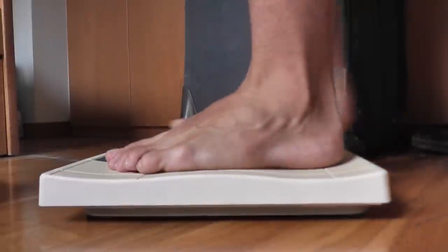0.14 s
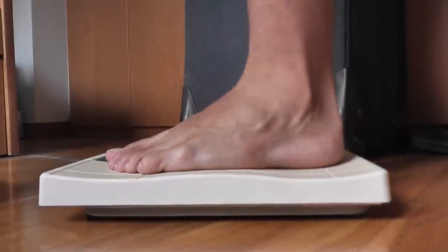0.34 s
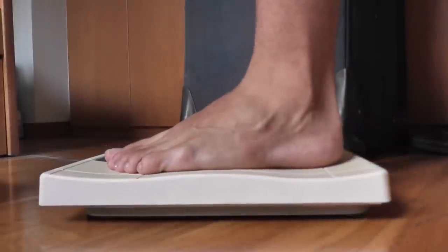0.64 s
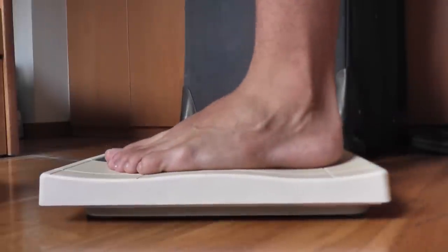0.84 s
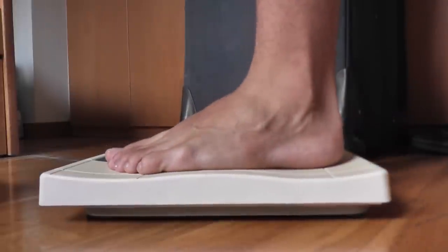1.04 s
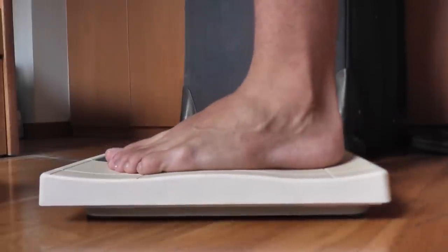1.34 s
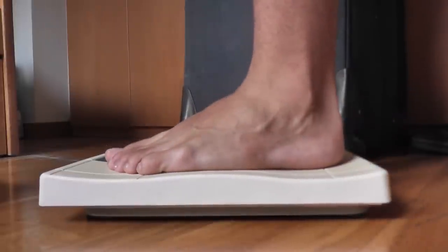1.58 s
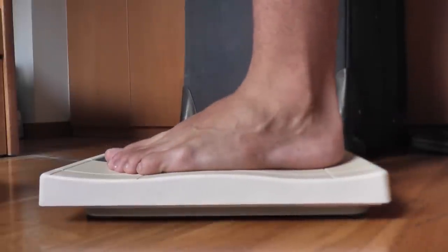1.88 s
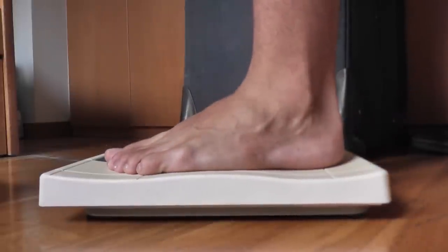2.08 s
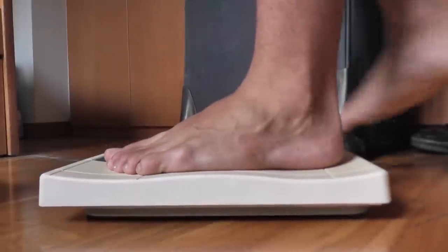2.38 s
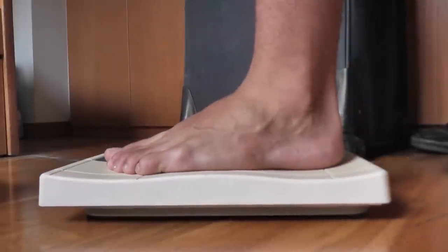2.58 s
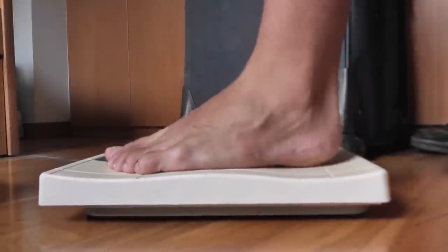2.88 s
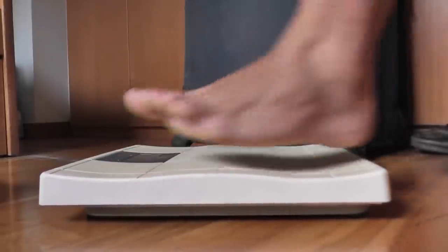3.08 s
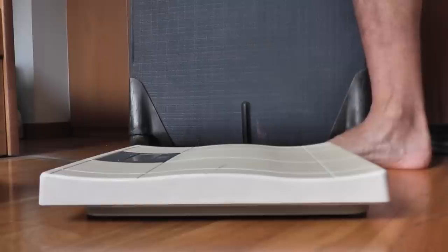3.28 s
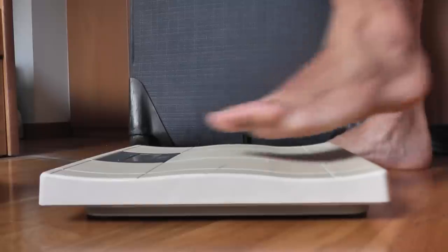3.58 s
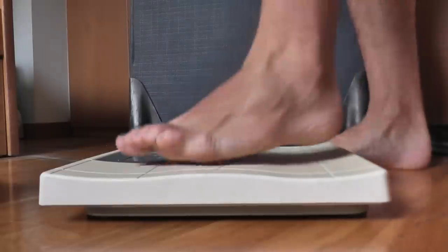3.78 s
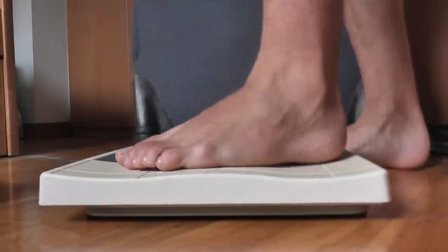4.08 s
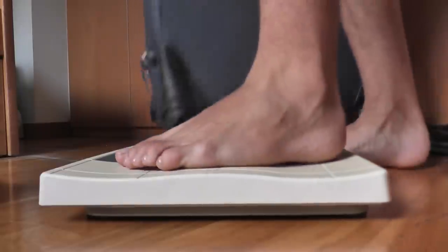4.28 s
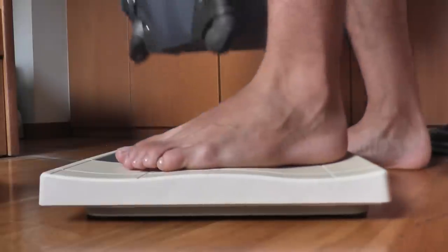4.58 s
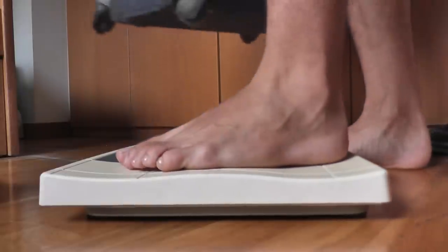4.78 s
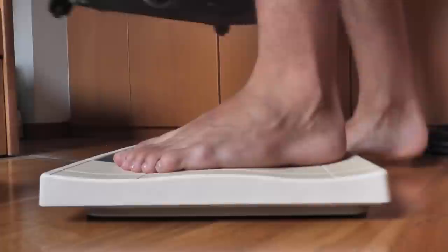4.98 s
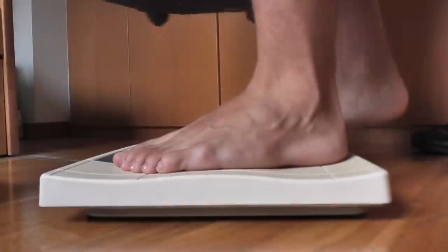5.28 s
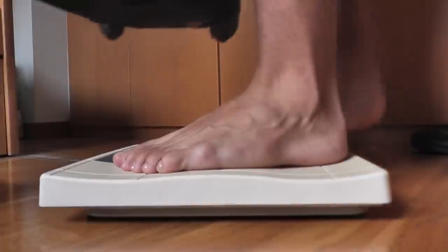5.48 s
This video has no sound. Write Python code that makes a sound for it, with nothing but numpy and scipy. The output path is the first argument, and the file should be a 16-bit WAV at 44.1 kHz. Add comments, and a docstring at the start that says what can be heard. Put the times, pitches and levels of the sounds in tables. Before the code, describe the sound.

Bare feet step off and back onto a hollow plastic bathroom scale, with clacks, creaks, a dial rattle, then a suitcase's rubbing fabric hiss.

```python
"""A low hum in a small room, then clacks and creaks: bare feet on a mechanical bathroom scale, on a wooden floor.
The platform springs up when the weight leaves it, and its dial rattles back to the stop.
Then the person steps on again with a suitcase, whose fabric rubs and hisses as it is lifted.
Blows are decaying sine waves plus a burst of noise; creaks, skin, fabric and room rumble are shaped noise.
The hum is two wavering sine waves."""
import sys
import numpy as np
from scipy import signal
from scipy.fft import rfft, irfft, next_fast_len
from scipy.io import wavfile
from scipy.ndimage import uniform_filter1d, map_coordinates

SR = 44100
rng = np.random.default_rng(int(sys.argv[2]) if len(sys.argv) > 2 else 0)


def to_wav(s):
    """Save 16-bit WAV."""
    ch = np.atleast_2d(s).T  # columns
    pcm = np.round(np.clip(ch, -1, 1) * 32767)  # PCM
    wavfile.write(sys.argv[1], SR, pcm.astype(np.int16))


N = 248724  # length in samples


def amp(db):
    """Decibels to gain."""
    return 10 ** (np.asarray(db) / 20)


def unit(x):
    """Scale to an rms (average strength) of 1."""
    return x / np.sqrt(np.mean(x ** 2) + 1e-20)


def seconds():
    """The time of every sample."""
    return np.arange(N) / SR


def along(points, hz):
    """Read a curve of (Hz, value) points, joined by lines on a log frequency axis."""
    point_hz, value = np.transpose(points)
    return np.interp(np.log(hz + 1), np.log(point_hz + 1), value)


def curve(rows):
    """Join (seconds, value) points into one value per sample."""
    s, value = np.transpose(rows)
    return np.interp(seconds(), s, value)


def wobble(rate):
    """A smooth random curve with this many random points a second."""
    points = rng.standard_normal(int(N * rate / SR) + 4)
    return map_coordinates(points, [np.arange(N) * rate / SR])


def filtered(x, response):
    """Multiply the spectrum of x by a gain that depends on frequency."""
    size = x.shape[-1]
    padded = next_fast_len(size + 8192)  # spare room at the end, so the filter does not wrap around
    spectrum = rfft(x, padded) * response(np.fft.rfftfreq(padded, 1 / SR))
    return irfft(spectrum, padded)[..., :size]


def coloured(x, spectrum):
    """Shape x with a table of (Hz, dB) points, then scale it to rms 1."""
    return unit(filtered(x, lambda hz: amp(along(spectrum, hz))))


def stereo_noise(side_db, size):
    """White noise shared by both ears, plus a part with opposite signs that makes it wide."""
    mid, side = rng.standard_normal((2, size)) * amp([[0], [side_db]])
    return np.array([mid + side, mid - side])


# How long the walls answer.
# Each row: frequency in Hz, time to fade by 60 dB in seconds.
ROOM_FADE = [(100, 0.39), (500, 0.21), (2000, 0.33), (7000, 0.29), (14000, 0.037)]


def in_room(x, wet_db, side_db):
    """A mono sound plus the walls' answer: fresh noise that fades at its own speed at each frequency."""
    hz, t, noise = signal.stft(stereo_noise(side_db, size=SR // 2), SR, nperseg=256)
    fade = amp(-60 * t / along(ROOM_FADE, hz)[:, None])
    onset = 1 - np.exp(-t / 0.00085)
    tail = signal.istft(noise * fade * onset, SR, nperseg=256)[1]
    tail *= amp(wet_db) / np.linalg.norm(tail[0])
    tail[:, 0] += 1  # the direct sound
    return signal.fftconvolve(x[None], tail, axes=1)[:, :len(x)]


# The colour of the room's rumble. Each row: frequency in Hz, relative level in dB.
RUMBLE_COLOUR = [(15, -76), (25, -62), (59, -6.5), (96, -10.5), (128, -6), (186, -15), (205, -10.5),
                 (279, -12), (386, -19), (517, -18), (788, -22.5), (988, -30), (1200, -38), (1560, -61),
                 (2640, -120)]
# The hum's notes. Each row: frequency in Hz, middle level in dB, around which it wavers.
HUM_NOTES = [(129, -56), (177, -58.5)]
# The colour of the room's faint hiss. Each row: frequency in Hz, relative level in dB.
HISS_COLOUR = [(700, -46), (1100, 3.5), (1450, 5), (1800, -3.5), (2250, -8), (2900, -3), (3800, -6.5),
               (4600, -11.5), (6100, -5), (7500, -11.5), (9000, -12), (11000, -16.5), (13400, -16.5),
               (14200, -49)]
RUMBLE_DB, HISS_DB = -52.5, -65


def room_tone():
    """A steady noise rumble and faint hiss, with sine waves whose loudness and phase waver."""
    t = seconds()
    hum = 0
    for hz, db in HUM_NOTES:
        loudness = amp(db + 2.5 * wobble(7))
        hum = hum + loudness * np.sin(2 * np.pi * hz * t + .7 * wobble(9))
    rumble = amp(RUMBLE_DB) * coloured(stereo_noise(-2.3, size=N), RUMBLE_COLOUR)
    hiss = amp(HISS_DB) * coloured(stereo_noise(-9.0, size=N), HISS_COLOUR)
    return rumble + hum + hiss


# Skin dragging over plastic and wood.
# Each row: middle of the stroke in seconds, length in seconds, level in dB.
SKIN_STROKES = [(3.855, 0.03, -41.5), (3.968, 0.042, -39), (4.059, 0.011, -42), (4.098, 0.052, -36),
                (5.278, 0.022, -42), (5.325, 0.026, -39), (5.611, 0.024, -33)]
# The colour of the skin noise. Each row: frequency in Hz, relative level in dB.
SKIN_COLOUR = [(150, -17), (400, 0.5), (800, 1.5), (1000, -6), (1450, -1), (1800, -6), (2300, -23),
               (3500, -18), (8000, -37), (15000, -60)]


def scuffs():
    """Short strokes of skin, sticking and slipping unevenly: noise swells with a random flutter."""
    t = seconds()
    strokes = sum(amp(db) * np.exp(-(2 * (t - s) / length) ** 2) for s, length, db in SKIN_STROKES)
    grain = coloured(amp(0.81 * wobble(400)) * rng.standard_normal(N), SKIN_COLOUR)
    return in_room(strokes * grain, wet_db=-9.5, side_db=0)


JOLT_S, JOLT_WIDTH_S = 2.891, 0.0019  # middle of the push, and its time scale


def jolt():
    """The unloaded scale jumps and gives the floor one low push: a single down-and-up pulse."""
    u = (seconds() - JOLT_S) / JOLT_WIDTH_S
    return amp(-20.5) * u * np.exp(-u ** 2)


# The linkage creaks as the load shifts.
# Each row: peak in seconds, level in dB before the levers' overall cut, build-up in seconds (60 dB of rise).
LINKAGE_CREAKS = [(.208, -35.5, .035), (2.078, -48, .3), (2.163, -39.5, .14), (2.203, -36.5, .18),
                  (3.062, -34.5, .13)]
# The colour of the creaks and the rattle. Each row: frequency in Hz, relative level in dB.
LEVER_COLOUR = [(120, -63), (200, -7), (292, -20), (376, -29), (451, -5), (624, -5.5), (896, -2.5),
                (980, -13.5), (1490, -6), (2210, -20.5), (3670, -16), (4640, -22), (8880, -22.5),
                (13700, -43), (15000, -62)]
# each creak fades fast (seconds per 60 dB) and leaves the dial quivering, softer but longer
CREAK_T60_S, QUIVER_DB, QUIVER_T60_S = 0.13, -20.5, 0.78
# the dial runs back to its stop, getting softer
DIAL_START_S, DIAL_STOP_S, DIAL_DB, DIAL_SLOWS_DB_PER_S = 2.892, 3.06, -32, 74
LEVERS_DB = -2.5  # overall


def levers():
    """The linkage creaks and the dial rattles: dense small slips in uneven clumps."""
    t = seconds()
    dial_runs = (t > DIAL_START_S) * (t < DIAL_STOP_S)
    level = amp(DIAL_DB - DIAL_SLOWS_DB_PER_S * np.abs(t - DIAL_START_S)) * dial_runs
    for s, db, build_up in LINKAGE_CREAKS:
        before, after = np.maximum(s - t, 0), np.maximum(t - s, 0)
        creak = amp(-60 * after / CREAK_T60_S)
        quiver = amp(QUIVER_DB - 60 * after / QUIVER_T60_S)
        swell = amp(db - 60 * before / build_up)
        level = np.hypot(level, swell * (creak + quiver))
    slips = (rng.random(N) < 1500 / SR) * rng.standard_normal(N)  # about 1500 a second
    rough = unit(slips) + 1.64 * rng.standard_normal(N)
    clumps = amp(1.8 * wobble(180))
    grain = coloured(clumps * rough, LEVER_COLOUR)
    return in_room(amp(LEVERS_DB) * level * grain, wet_db=-9.5, side_db=-3.0)


# How fast the suitcase's fabric slides, told by its hiss.
# Each row: time in seconds, level in dB before the boost RUB_HISS_DB.
RUB_SPEED = [(3.34, -60), (3.68, -62), (3.93, -57), (3.96, -48), (4.02, -60), (4.08, -57), (4.12, -43),
             (4.17, -47), (4.26, -40), (4.42, -45), (4.52, -41), (4.81, -49), (4.88, -45), (5.02, -53),
             (5.04, -46), (5.47, -42), (5.5, -49), (5.64, -54)]
# The colour of the fabric's hiss. Each row: frequency in Hz, relative level in dB.
WEAVE_COLOUR = [(880, -65), (1500, -20), (1820, -9.5), (2270, -15), (2860, -4.5), (3540, -3), (4680, -6.5),
                (6490, 0.5), (7790, -5.5), (8580, -3.5), (13600, -27.5), (14600, -41), (15000, -68)]
# The colour of the shell's murmur. Each row: frequency in Hz, relative level in dB.
SHELL_COLOUR = [(41, -66), (70, 3.5), (98, -5), (132, -5), (205, -2), (332, 4), (393, -0.5), (523, 0.5),
                (862, -5.5), (973, -13), (1180, -7), (2270, -19.5), (2600, -15), (3380, -17), (5720, -120)]
RUB_START_S, RUB_HISS_DB = 3.327, 3
SHELL_DB, SHELL_GROWS = -49.5, .6  # murmur at average speed, in the air; its dB per dB of hiss
LIFT_OFF_S, LIFT_S, ON_FLOOR_DB = 4.22, 0.052, 6  # the floor strengthens the murmur until the lift
GRAB_DB, GRAB_S = 6.5, .07  # the first pull shakes the shell, then dies away


def suitcase():
    """Coarse fabric hisses as it slides, and the shell behind it murmurs."""
    t = seconds()
    rub_db = curve(RUB_SPEED)
    since = np.maximum(t - RUB_START_S, 0)
    touching = np.clip(since / .004, 0, 1)

    threads = amp(.5 * wobble(300) + .3 * wobble(25))  # fine and slow unevenness
    hiss = amp(rub_db + RUB_HISS_DB) * coloured(threads * stereo_noise(-12, size=N), WEAVE_COLOUR)
    fizz = filtered(hiss, lambda hz: hz ** 4 / (hz ** 4 + 9500 ** 4))  # the top end
    brighter = amp(.2 * (rub_db - np.percentile(rub_db, 80)))
    hiss = hiss + (brighter - 1) * fizz  # faster rubbing raises the top end, slower lowers it

    on_floor = np.clip((LIFT_OFF_S - t) / LIFT_S + .5, 0, 1)
    speed_db = rub_db - rub_db[since > 0].mean()
    grab_db = GRAB_DB * np.exp(-since / GRAB_S)
    shell_db = SHELL_DB + SHELL_GROWS * speed_db + ON_FLOOR_DB * on_floor + grab_db
    pressure = amp(.6 * wobble(20))
    shell = amp(shell_db) * pressure * coloured(stereo_noise(-8.5, size=N), SHELL_COLOUR)
    return touching * (hiss + shell)


# The colour of hard plastic's contact noise. Each row: frequency in Hz, relative level in dB.
PLASTIC_COLOUR = [(30, -44), (100, 3.5), (200, 3.5), (480, -3), (850, -3), (1000, -13), (1450, 3.5),
                  (2200, -12.5), (3400, -9.5), (4700, -12), (6500, -8.5), (9300, -12), (11500, -22.5),
                  (15000, -28.5)]
# The four parts of a blow, in order: body, thump, clack, tick.
# Each row: lowest frequency in Hz, highest frequency in Hz.
BLOW_BANDS = [(240, 1050), (70, 250), (1000, 3700), (3700, 15000)]


def blows(rows, modes, noise_db, attack, focus_db, wet_db, side_db):
    """Each contact chatters briefly and rings the modes (natural notes); its row sets each band's level."""
    out, t = np.zeros((2, N + SR)), np.arange(SR // 2) / SR
    hz, mode_db, t60 = np.transpose(modes)[:, :, None]
    for s, db, thump_db, clack_db, tick_db, favoured_hz, chatter in rows:
        # the spot that is hit favours some modes
        place_db = focus_db * np.exp(-(np.log(hz / favoured_hz) / 0.066) ** 2)
        strength = amp(mode_db + place_db + rng.normal(0, 1.5, hz.shape))
        life = t60 * amp(0.11 * (db + 9.0))  # light touches are damped sooner by the foot
        ring = np.sum(strength * amp(-60 * t / life) * np.sin(2 * np.pi * hz * t), axis=0)

        # the chatter, and a first touch that always fades fast
        contact = amp(-60 * t / max(chatter, .004)) + 0.53 * amp(-60 * t / 0.0095)
        onset = 1 - np.exp(-t / 0.00033)
        noise = coloured(rng.standard_normal(len(t)), PLASTIC_COLOUR)
        crack = amp(noise_db) * contact * onset * noise

        blow = in_room((ring + crack) * (1 - np.exp(-t / attack)), wet_db, side_db)
        for band, rel_db in zip(BLOW_BANDS, (0, thump_db, clack_db, tick_db)):
            bandpass = signal.butter(3, band, 'bandpass', fs=SR, output='sos')
            part = signal.sosfilt(bandpass, blow)
            peak = np.sqrt(uniform_filter1d(part.mean(0) ** 2, size=220).max())  # loudest 5 ms
            out[:, round(s * SR):][:, :len(t)] += amp(db + rel_db) * part / peak
    return out[:, :N]


# Soles landing and shifting. Each row: start in seconds, body level in dB before the overall cut,
# thump in dB relative to the body, favoured mode in Hz, settling time (60 dB of fade) in seconds.
SOLE_STEPS = [(3.346, -29.5, -17, 560, 0.011), (3.924, -38.5, 7.5, 147, 0.26), (3.946, -24.5, 5.5, 715, .2),
              (4.126, -29.5, 3.5, 141, 0.063), (4.161, -37.5, -9, 345, .046),
              (4.609, -34.5, -15, 466, 0.0097), (5.612, -29, -5.5, 276, 0.076)]
# The loaded scale on the floorboards. Each row: frequency in Hz, relative level in dB,
# ringing time (60 dB of fade) in seconds for a blow of -9 dB; lighter blows ring shorter.
BOARD_MODES = [(86, 7, 0.058), (136.4, 9, 0.12), (168.3, 0.5, 0.28), (267, 3.5, 0.093), (330, -7.5, 0.17),
               (484, -2.5, 0.061), (559, 7.5, 0.033), (674, -8, 0.16), (1080, -31, 0.2), (1380, -36, 0.092),
               (1600, -30, 0.053)]
SOLE_CLACK_DB, SOLE_TICK_DB = -6.5, -27.5  # relative to the body; skin is soft: little treble
FEET_DB = -1.5  # overall


def feet():
    """Soft soles thud through the scale into the boards, which ring low and briefly."""
    contacts = []
    for s, db, thump_db, hz, settling in SOLE_STEPS:
        contacts.append((s, db, thump_db, SOLE_CLACK_DB, SOLE_TICK_DB, hz, settling))
    return amp(FEET_DB) * blows(contacts, BOARD_MODES, noise_db=-2.0, attack=0.0014, focus_db=10.5,
                                wet_db=-8.5, side_db=-2.5)


# Clacks of the platform and its levers. Each row: start in seconds, body level in dB before the overall cut,
# clack and tick in dB relative to the body, favoured mode in Hz.
PLATFORM_CLACKS = [(0.213, -28, -3, -18.5, 820), (0.3413, -37.5, -9, -13.5, 684),
                   (.3795, -46, -4, -23, 738), (0.4179, -33.5, -4, -7, 526), (1.033, -44, -11.5, -24, 653),
                   (2.039, -41.5, -16, -18, 530), (2.076, -34, -12, -17.5, 780),
                   (2.197, -29.5, -16, -5.5, 526), (2.674, -39.5, -3.5, -26, 692),
                   (2.704, -46, -2, -21, 660), (2.816, -43, -8, -11, 420), (2.887, -15.5, -1, -3, 454),
                   (2.937, -28.5, -2, -18, 331), (2.969, -29, -9, -18, 484),
                   (3.0625, -22.5, -11.5, -15.5, 499), (3.9831, -36, 0, -3.5, 370),
                   (4.119, -29, -19, -4, 513), (4.828, -11.5, -10.5, -24.5, 415),
                   (5.173, -36, -20, -35, 796), (5.325, -33.5, -18, -22, 450)]
# The scale's hollow case. Each row: frequency in Hz, relative level in dB,
# ringing time (60 dB of fade) in seconds for a blow of -9 dB; lighter blows ring shorter.
CASE_MODES = [(102, -16, 0.14), (170.4, -9, 0.2), (261, -11, 0.091), (316.2, -3, 0.11), (370, -2, 0.062),
              (433.8, -4, 0.12), (475, 3.5, 0.099), (529, -10.5, 0.19), (732, 3, 0.056), (815, -1, 0.035),
              (1150, -4, 0.078), (1349, -5, 0.12), (1500, -4, 0.1), (1690, -13, 0.084), (2300, -1, 0.011),
              (2600, -11, 0.06), (3500, -32, 0.025)]
CLACK_CHATTER_S = 0.025  # the contact noise fades by 60 dB in this time
CLACK_THUMP_DB, THUMP_PER_TICK = -23.5, .48  # the sharper the tick, the less bass a clack has
REBOUND_ABOVE_DB = -28.7  # blows heavier than this bounce once
REBOUND_S, REBOUND_DULLER_DB, REBOUND_CHATTER_S = .0205, 3, .04  # delay, treble loss, noise fade
REBOUND_LOSS_DB, LOSS_PER_TICK = 11.5, 0.27  # the sharper the tick, the weaker the bounce
PLATFORM_DB = -2.5  # overall


def platform():
    """Hard clacks of the plastic platform ring its case; the heavy ones rebound once, weaker and duller."""
    contacts = []
    for s, db, clack_db, tick_db, hz in PLATFORM_CLACKS:
        thump_db = CLACK_THUMP_DB - THUMP_PER_TICK * tick_db
        contacts.append((s, db, thump_db, clack_db, tick_db, hz, CLACK_CHATTER_S))
        if db > REBOUND_ABOVE_DB:
            loss_db = REBOUND_LOSS_DB + LOSS_PER_TICK * tick_db
            duller_clack_db = clack_db - REBOUND_DULLER_DB
            duller_tick_db = tick_db - 2 * REBOUND_DULLER_DB
            contacts.append((s + REBOUND_S, db - loss_db, thump_db, duller_clack_db,
                             duller_tick_db, hz, REBOUND_CHATTER_S))
    return amp(PLATFORM_DB) * blows(contacts, CASE_MODES, noise_db=9.5, attack=0.00051, focus_db=15.5,
                                    wet_db=-6.0, side_db=-7.5)


# How the sound leans to one ear. Each row: frequency in Hz, left minus right in dB.
STEREO_LEAN = [(60, -4), (140, -2), (300, -2), (600, 0), (1200, 0.5), (3000, -0.4)]
# How wide the sound is. Each row: frequency in Hz, gain of the left-right difference in dB.
STEREO_WIDTH = [(100, -5.5), (300, 0.5), (600, 0.5), (1100, 3.5), (2200, 1.9), (4000, -7.6), (8000, 1.8),
                (13000, 6)]


def scene():
    """All sources; the bass leans to the right and the width changes with frequency."""
    left, right = platform() + jolt() + feet() + scuffs() + levers() + suitcase() + room_tone()
    mid = (left + right) / 2
    side = filtered((left - right) / 2, lambda hz: amp(along(STEREO_WIDTH, hz)))
    widened = np.array([mid + side, mid - side])
    return filtered(widened, lambda hz: amp(np.outer([.5, -.5], along(STEREO_LEAN, hz))))


TOP_HZ = 14600


def record(dry):
    """A very steep low-pass filter removes nearly everything above TOP_HZ."""
    return filtered(dry, lambda hz: 1 / np.sqrt(1 + (hz / TOP_HZ) ** 120))


dry = scene()
out = record(dry)
to_wav(out)
```